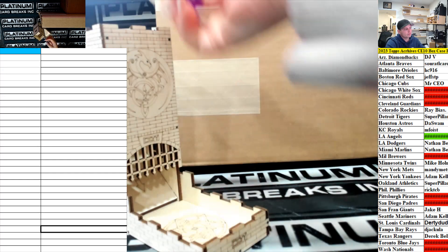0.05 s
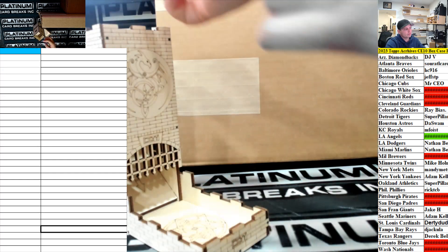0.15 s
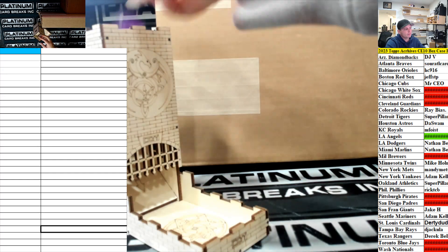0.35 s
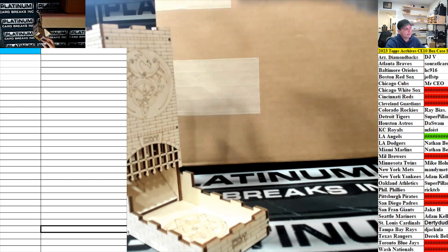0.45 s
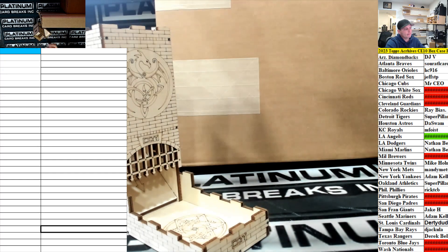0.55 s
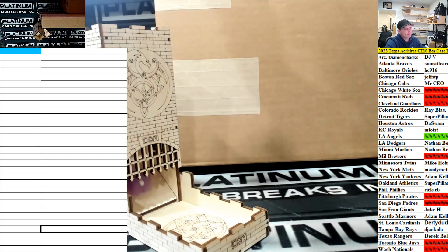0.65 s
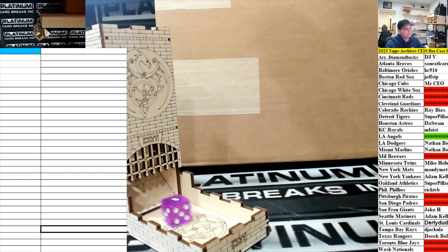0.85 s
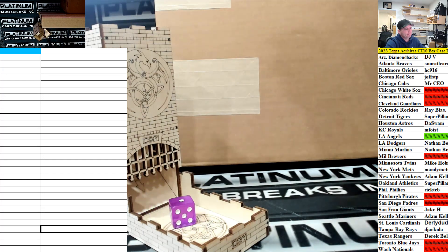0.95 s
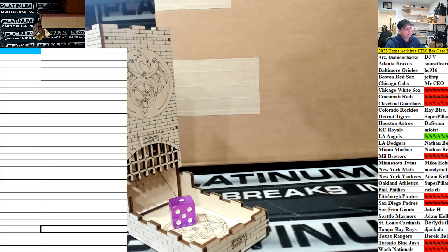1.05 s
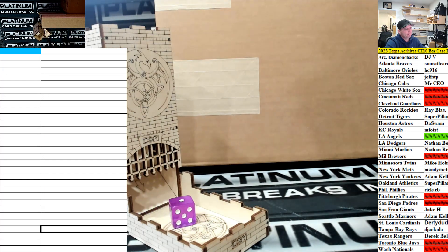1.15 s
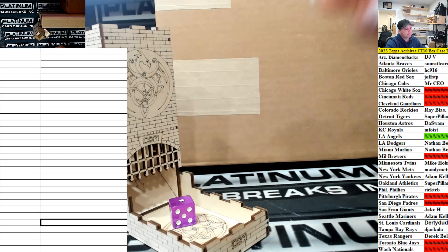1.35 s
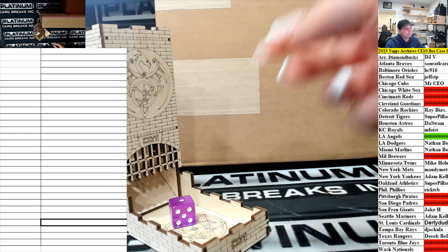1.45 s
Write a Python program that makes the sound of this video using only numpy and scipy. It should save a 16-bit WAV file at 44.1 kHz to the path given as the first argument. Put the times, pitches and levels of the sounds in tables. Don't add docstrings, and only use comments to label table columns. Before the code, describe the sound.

After a brief near-silence, a hard bright click begins a quick wooden clatter of a die falling down a tower, turning to hollower tray knocks and a last small rattle, close up in a small echoing room.

```python
import sys
import numpy as np
from scipy import signal
from scipy.fft import rfft, irfft
from scipy.io import wavfile

SR = 44100
rng = np.random.default_rng(int(sys.argv[2]) if len(sys.argv) > 2 else 0)


def transcribe(u):
    v = np.clip(np.atleast_2d(u).T, -1, 1)
    q = np.round(v * 32767).astype(np.int16)
    wavfile.write(sys.argv[1], SR, q)


def ratio(d):
    e = np.asarray(d, float) / 20
    return 10 ** e


N = 66150

# (time [s], edge level [dB], table level [dB], panel level [dB], die level [dB])
KNOCKS = [(0.2247, -5, -21, -17, 0.5), (0.2287, -14, -19, -18, -6.5), (0.2351, -16, -19, -15, -2),
          (0.2493, -21, -21, -14, -7.5), (.2535, -18.5, -23, -13.5, -6.5),
          (0.264, -10.5, -26.5, -12, -11.5), (.2700, -17.5, -27.5, -11.5, -13.5),
          (.2881, -15, -35, -8, -11.5), (.2925, -16, -29.5, -12.5, -17), (0.3163, -7.5, -23, -14.5, -9),
          (.3205, -17, -18.5, -15.5, -15), (0.3257, -20, -26, -8.5, -13), (0.3357, -22, -14, -5, -13.5),
          (0.36, -8, -25, -19, -8.5), (.3650, -16.5, -25, -13, -12), (.3720, -19, -27, -8.5, -15.5),
          (0.3829, -25, -15, -16.5, -9), (0.399, -20.5, -25, -9, -14.5), (.4070, -19, -27.5, -9.5, -11),
          (.4115, -21, -21.5, -10.5, -16), (.4200, -9, -35, -15, -15), (.4348, -19.5, -26, -10.5, -24.5),
          (0.4446, -14, -15.5, -4.5, -3), (.4530, -18, -20, -8, -5.5), (0.5056, -23, -10, -0.5, -8.5),
          (.5090, -16, -16, -2, -2.5), (.5120, -10, -19.5, -11.5, 0.5), (.5200, -23, -27, -1, -10),
          (0.5384, -23, -19.5, 3, -16), (.5620, -28.5, -19, 5, -16), (0.6104, -16.5, -29, -11, -31),
          (0.6156, -26, -23, -3.5, -21.5), (.6200, -24, -26.5, -1.5, -18), (0.6311, -13, -42.5, -15, -15),
          (.6380, -24, -34.5, -6, -18), (0.6414, -23.5, -30.5, -11, -18), (.6480, -32, -31, -7, -25),
          (.6550, -29.5, -17, -9.5, -12), (.6680, -28, -21, -8, -17)]
# (frequency [Hz], level [dB], t60 [s])
TABLE_MODES = [(84, -7.5, 0.25), (108, -3.5, 0.071), (125, -2.5, 0.1), (163, -3, 0.077), (221, -3.5, 0.13),
               (300, -2.5, 0.023), (378, -7.5, 0.042), (480, -8.5, .025), (580, -4.5, 0.025)]
# (frequency [Hz], level [dB], t60 [s])
PANEL_MODES = [(724, 0, 0.021), (816.6, -5, 0.047), (953, -7.5, .04), (1063, -5.5, 0.027),
               (1189, -6.5, .04), (1277, -5, 0.048), (1452, 0, 0.027), (1720, -3, .025)]
# (frequency [Hz], level [dB], t60 [s])
EDGE_MODES = [(1885, -5.5, 0.011), (2155, -2.5, 0.0093), (2534, -6.5, 0.022), (2976, -2, 0.0094),
              (3496, -4, 0.0089), (3855, -5.5, 0.0082), (4210, -7, 0.0097), (4470, -8, 0.0087),
              (5210, -3.5, 0.0036)]
# (frequency [Hz], level [dB], t60 [s])
DIE_MODES = [(5874, -3.5, .004), (6680, -5.5, .004), (6950, -2.5, 0.0081), (8050, -4.5, 0.0067),
             (9270, -12, 0.011), (11130, -13.5, 0.0078), (12410, -18, .007), (13560, -19.5, .01),
             (14476, -19, .007), (15360, -20, .007)]
# (time [s], frequency [Hz], level [dB], t60 [s])
RINGS = [(0.2247, 8640, -11, 0.02), (0.2255, 10150, -9, 0.014), (0.224, 4479, -9.5, 0.01),
         (.2250, 2900, -14, 0.0069), (.2290, 2620, -5.5, 0.015), (.2300, 221, -26, 0.15),
         (.3220, 221, -34, .2), (.2280, 130, -27.5, .05), (.2270, 390, -28.5, .04),
         (0.25, 4690, -14.5, .02), (.2470, 4450, -19.5, .03), (.2600, 4200, -22, 0.045),
         (0.29, 2600, -22, .03), (.2920, 3300, -25, 0.02), (.2500, 8570, -26, 0.13),
         (0.233, 8570, -14.5, 0.03), (0.267, 1242, -27, 0.096), (.2885, 6400, -18, 0.013),
         (.3165, 7300, -23.5, .006), (.3200, 2500, -17.5, 0.01), (.3170, 730, -28, .04),
         (0.3612, 6755, -18.5, 0.0147), (0.364, 4420, -14, 0.01), (.4210, 1623, -10.5, 0.01),
         (.4250, 1236, -23, 0.22), (0.425, 2499, -21, 0.01479), (0.435, 1650, -18.5, .015),
         (.4444, 1237, -23.5, 0.086), (.4443, 820, -24.5, 0.035), (0.4458, 6733, -21.5, .012),
         (0.450, 720, -25.5, 0.04), (0.51, 1236, -21.5, 0.0385), (.5250, 1290, -31, .15),
         (.5250, 930, -32.5, .15), (.5115, 7000, -19, 0.011), (.5170, 810, -21.5, 0.053),
         (0.514, 2367, -12.5, 0.012), (.5150, 715, -17.5, 0.045), (.5390, 1190, -19.5, 0.023),
         (0.611, 6580, -22.5, 0.0059), (.6105, 1700, -17.5, .005), (0.6119, 1450, -31.5, 0.04),
         (.6120, 810, -33.5, .03), (.6312, 1440, -28, 0.0455), (.6310, 1950, -11.5, 0.005),
         (.6315, 5900, -22, .005), (.6330, 800, -34, .03), (.6150, 2200, -30, 0.023),
         (.6370, 3200, -28.5, 0.018), (.6380, 3800, -34, 0.013)]
# (delay [s], level [dB])
ECHOES = [
    (.0045, -4),
    (.0098, -12),
    (0.014, -16.5),
    (.024, -18),
    (.03, -12.5),
]
# (frequency [Hz], t60 [s])
ROOM_T60 = [(60, 0.75), (250, 0.49), (800, 0.35), (1500, 0.31), (3000, .3), (8000, 0.26), (15000, 0.26)]
# (frequency [Hz], level [dB])
ROOM_COLOUR = [(60, -7), (300, -3.5), (800, -6), (1500, -0.5), (3000, -4), (8000, 0), (15000, -9.5)]
ROOM_PLACE_TIMES = (.2, .26, .31, .355, .415, .5, .6, .628, .9)
# (frequency [Hz], level per Hz [dB])
HUSH_SPECTRUM = [(21, -20), (42, 2), (90, -5), (189, -16), (349, -12), (567, -16), (700, -22), (15700, -33)]

TABLE_DB, PANEL_DB, EDGE_DB, DIE_DB = -6.5, -9, -10, -8
STRIKE_SPREAD_DB = 1.5
CONTACT_S, CONTACT_RISE_S = 0.0036, 0.0002
CRACK_DB, CRACK_T60_S, CRACK_LOW_HZ, CRACK_HIGH_HZ = 8, 0.018, 3020, 16300
RING_ATTACK_S, RING_ROOM_DB = 0.00021, -13
ECHO_SMEAR_S = 0.0005
ROOM_DB, ROOM_BUILD_S = -24.5, 0.0013
HUSH_DB, HUSH_PATCHY_DB = -70.5, 0.8
CUTOFF_HZ, MIC_LOW_HZ = 16300, 42


def die_in_tower():
    _, edge_db, table_db, panel_db, die_db = np.transpose(KNOCKS)
    shove = np.ones((len(KNOCKS), 1))
    rattle = chatter(len(KNOCKS), CONTACT_S * np.log(1000), CONTACT_RISE_S)
    table = body(TABLE_MODES, edge_db + table_db + TABLE_DB, shove)
    panels = body(PANEL_MODES, edge_db + panel_db + PANEL_DB, shove)
    edges = body(EDGE_MODES, edge_db + EDGE_DB, rattle)
    die = body(DIE_MODES, edge_db + die_db + DIE_DB, rattle)
    return table + panels + edges + die + cracks(edge_db + die_db + CRACK_DB)


def body(modes, knock_db, push):
    starts = (np.array(KNOCKS)[:, :1] * SR).astype(int)
    at = starts + np.arange(push.shape[1])
    luck = rng.standard_normal((len(KNOCKS), len(modes)))
    out = 0
    for k, (hz, db, t60) in enumerate(modes):
        strength = ratio(knock_db + db + STRIKE_SPREAD_DB * luck[:, k])
        polarity = (-1) ** k
        force = np.zeros(N)
        np.add.at(force, at, strength[:, None] * push * polarity)
        out = out + ring(force, hz, t60)
    return out


def ring(clicks, hz, t60):
    radius = ratio(-60 / (t60 * SR))
    turn = 2 * np.pi * hz / SR
    feedback = [1, -2 * radius * np.cos(turn), radius * radius]
    return signal.lfilter([0, np.sin(turn)], feedback, clicks + 1e-18)


def cracks(knock_db):
    out = np.zeros(N)
    bursts = chatter(len(KNOCKS), CRACK_T60_S, CONTACT_RISE_S)
    for (time, *_), db, burst in zip(KNOCKS, knock_db, bursts):
        start = int(time * SR)
        out[start:start + len(burst)] += ratio(db) * burst
    bright = signal.butter(2, [CRACK_LOW_HZ, CRACK_HIGH_HZ], "band", fs=SR, output="sos")
    return signal.sosfilt(bright, out)


def chatter(count, t60, rise_s):
    t = np.arange(1024) / SR
    shape = ratio(-60 * t / t60) * (1 - np.exp(-t / rise_s))
    window = np.minimum(1, 4 * shape / shape.max())
    push = rng.standard_normal((count, len(t))) * shape
    for _ in range(8):
        spectrum = rfft(push)
        push = irfft(spectrum / (np.abs(spectrum) + 1e-9)) * window
    return push / np.sqrt(np.sum(push ** 2, axis=1, keepdims=True))


def rings():
    out = np.zeros(N + SR)
    t = np.arange(SR // 4) / SR
    attack = 1 - np.exp(-t / RING_ATTACK_S)
    for time, hz, db, t60 in RINGS:
        start = int(max(time, KNOCKS[0][0]) * SR)
        out[start:start + len(t)] += ratio(db - 60 * t / t60) * attack * np.sin(2 * np.pi * hz * t)
    return out[:N]


def room(x):
    t = np.arange(SR * 3 // 4) / SR
    now = np.arange(N) / SR
    places = len(ROOM_PLACE_TIMES) - 1
    reads = np.arange(len(t)) + 2 ** 12 * np.arange(places)[:, None]
    tails = 0
    for hz, noise in bands(2 * SR):
        decay_db = -60 * t / at_hz(ROOM_T60, hz)
        tails = tails + noise[reads] * ratio(at_hz(ROOM_COLOUR, hz) + decay_db)
    tails = tails * ratio(ROOM_DB) * (1 - np.exp(-t / ROOM_BUILD_S))

    smears = chatter(len(ECHOES), ECHO_SMEAR_S * np.log(1000), ECHO_SMEAR_S / 2)
    for (delay, db), smear in zip(ECHOES, smears):
        start = int(delay * SR)
        tails[:, start:start + len(smear)] += ratio(db) * smear

    out = np.zeros(N)
    for start, end, tail in zip(ROOM_PLACE_TIMES, ROOM_PLACE_TIMES[1:], tails):
        here = x * (now >= start) * (now < end)
        out += signal.fftconvolve(here, tail)[:N]
    return out


def hush():
    out = 0
    for hz, noise in bands(N + SR):
        waver = np.interp(np.arange(N), np.linspace(0, N, 16), rng.standard_normal(16))
        settled = noise[SR:]
        out = out + settled * ratio(at_hz(HUSH_SPECTRUM, hz) + HUSH_PATCHY_DB * waver)
    return ratio(HUSH_DB) * out / out.std()


def bands(size):
    edges = 20 * 2 ** np.arange(0, 9.8, 1 / 3)
    white = rng.standard_normal((2, size))
    for k, (low, high) in enumerate(zip(edges, edges[1:])):
        band = signal.butter(2, [low, high], "band", fs=SR, output="sos")
        yield np.sqrt(low * high), signal.sosfilt(band, white[k % 2])


def at_hz(points, hz):
    table_hz, values = np.transpose(points)
    return np.interp(np.log(hz), np.log(table_hz), values)


def scene():
    knocks, tones = die_in_tower(), rings()
    reflected = room(knocks + ratio(RING_ROOM_DB) * tones)
    return (knocks + tones + reflected + hush())[None]


def band_limit(x):
    return signal.sosfilt(signal.butter(12, 16910, fs=SR, output="sos"), x)


def record(dry):
    top_cut = signal.cheby2(12, 60, CUTOFF_HZ, fs=SR, output="sos")
    low_cut = signal.butter(4, MIC_LOW_HZ, "high", fs=SR, output="sos")
    mix = signal.sosfilt(low_cut, signal.sosfilt(top_cut, dry))
    return band_limit(mix)


dry = scene()
out = record(dry)
transcribe(out)
```